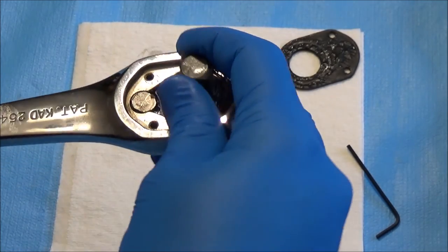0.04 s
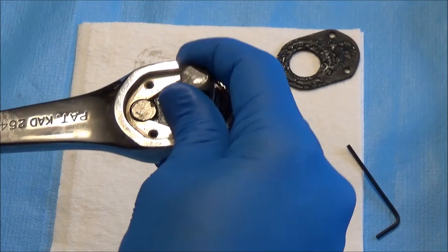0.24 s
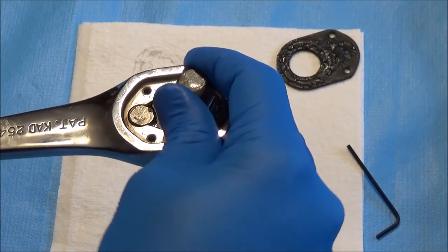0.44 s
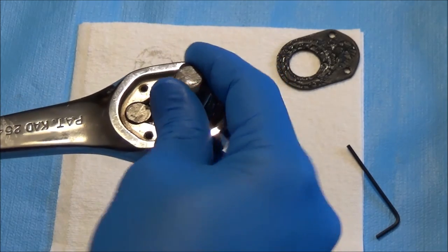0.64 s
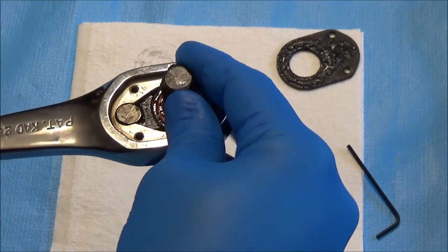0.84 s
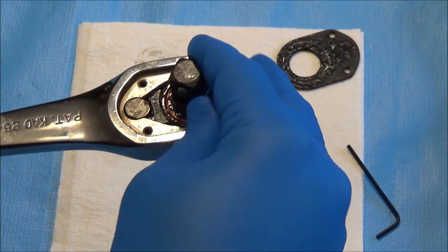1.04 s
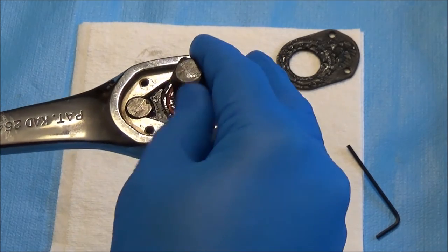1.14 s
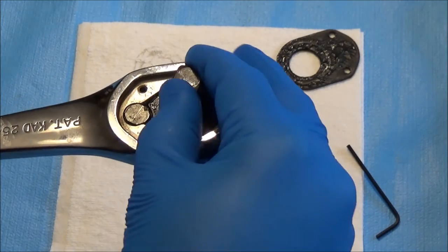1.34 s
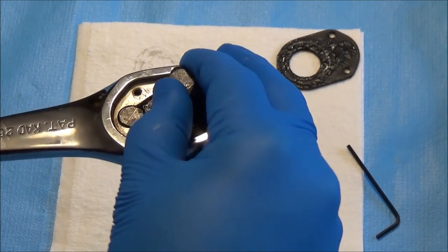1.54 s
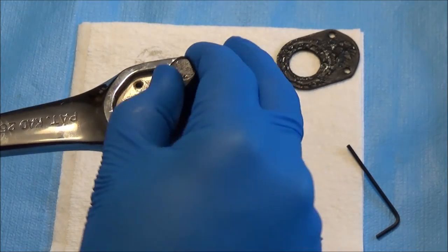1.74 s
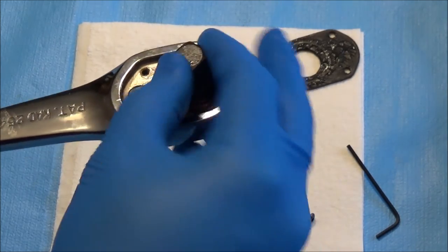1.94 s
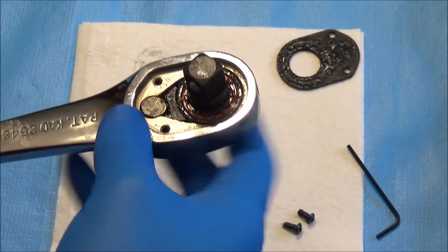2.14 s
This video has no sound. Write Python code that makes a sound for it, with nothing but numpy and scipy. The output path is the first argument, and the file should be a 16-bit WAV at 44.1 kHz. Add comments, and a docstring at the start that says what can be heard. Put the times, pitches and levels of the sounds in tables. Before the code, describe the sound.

Ratchet pawl clicking over gear teeth in two short runs, sharp metallic clicks, quiet small workshop

```python
"""In a quiet workshop one hears hiss, a low drone and fast soft pulsing; a glove rubs and loose parts tick.
A gloved hand close by turns the gear of an opened ratchet head: in two short runs, near the start and
near the end, the pawl drops over the teeth. Each drop makes decaying sines ring and a noise burst crack.
A hum comes and goes, and the drone swells near the end. Filtered noise, dying away, answers as the small room."""
import sys
import numpy as np
from scipy import signal
from scipy.fft import rfft, irfft
from scipy.io import wavfile

SR = 44100
rng = np.random.default_rng(int(sys.argv[2]) if len(sys.argv) > 2 else 0)


def master_out(mix):
    """Clip the mix to full scale and print it as 16-bit PCM to the path in sys.argv[1]."""
    frames = np.transpose(np.atleast_2d(mix))
    ceiling = np.clip(frames, -1, 1)
    pcm = np.round(ceiling * 32767).astype(np.int16)
    wavfile.write(sys.argv[1], SR, pcm)


N = 97020  # length in samples
TIME = np.arange(N) / SR  # seconds


def from_db(db):
    """Turn decibels into a gain."""
    return 10 ** (np.asarray(db) / 20)


def rms_one(x):
    """Scale a sound to an average (rms) level of 1."""
    return x / np.sqrt(np.mean(x ** 2) + 1e-20)


def at_hz(points):
    """Read a table of (Hz, value) at every FFT bin, in straight lines over log frequency."""
    hz, value = np.transpose(points)
    bin_hz = np.arange(N // 2 + 1) * SR / N
    return np.interp(np.log(bin_hz + 1), np.log(hz + 1), value)


def over_time(points):
    """Read a table of (seconds, value) at every sample."""
    return np.interp(TIME, *np.transpose(points))


def dying(start, t60):
    """An envelope that jumps to 1 and dies away by 60 dB in t60 seconds."""
    progress = np.clip((TIME - start) / t60, 0, 10)
    return (TIME >= start) * np.exp(-np.log(1000) * progress)


def noise(spectrum):
    """Mono noise of a given colour, rms 1."""
    return rms_one(irfft(rfft(rng.standard_normal(N)) * from_db(at_hz(spectrum)), N))


def stereo_noise(spectrum, likeness):
    """Stereo noise of a given colour, rms 1; the sides are the same at likeness 1 and unrelated at 0."""
    mid, side = rfft(rng.standard_normal((2, N))) * from_db(at_hz(spectrum))
    shared = np.sqrt(1 + likeness) * mid
    opposed = np.sqrt(1 - likeness) * side * [[1], [-1]]
    return rms_one(irfft(shared + opposed, N))


def band_noise(hz, width):
    """Noise in a soft-edged band, rms 1; its edges lie a factor of width either side of hz."""
    sos = signal.butter(2, [hz / width, hz * width], "band", fs=SR, output="sos")
    return rms_one(signal.sosfilt(sos, rng.standard_normal(N)))


def burst(source, start, t60):
    """A short dying piece of noise with a set energy."""
    envelope = dying(start, t60)
    return rms_one(source * envelope) * np.sqrt(np.mean(envelope ** 2))


def ring(clicks, hz, t60):
    """A resonance: each unit click sets off a sine that starts at height 1 and dies away."""
    r = np.exp(-np.log(1000) / (t60 * SR))  # what is left after one sample
    w = 2 * np.pi * hz / SR
    # the tiny offset keeps the filter away from extremely small numbers
    return signal.lfilter([0, np.sin(w)], [1, -2 * r * np.cos(w), r * r], clicks + 1e-18)


def tone(hz):
    """A steady sine of rms 1 with a random phase."""
    return np.sqrt(2) * np.sin(2 * np.pi * (hz * TIME + rng.random()))


def room_hiss():
    """Steady coloured noise whose left-right likeness depends on frequency."""
    # Colour of the hiss. Each row: frequency in Hz, relative level in dB per Hz.
    hiss_colour = [(20, -4), (40, -10.5), (60, -4.5), (100, -4.5), (220, -3.5), (400, -7.5), (700, -9),
                   (1250, -9.5), (2000, -13.5), (4000, -16), (8000, -21), (12000, -22), (16000, -30)]
    # Each row: frequency in Hz, left-right likeness from 0 to 1.
    hiss_likeness = [(60, .99), (150, 0.92), (380, 0.5), (950, 0.078), (2400, 0.27), (6000, 0.74),
                     (15000, 1)]
    hiss_db = -61
    return from_db(hiss_db) * stereo_noise(hiss_colour, at_hz(hiss_likeness))


def low_drone():
    """One deep sine whose level drifts."""
    # Level of the drone. Each row: time in seconds, level in dB.
    drone_level = [(0.0, -77), (0.02, -78.5), (0.78, -70), (1.31, -76), (1.38, -65.5), (2.11, -58),
                   (2.2, -61)]
    drone_hz = 32.4
    return from_db(over_time(drone_level)) * tone(drone_hz)


def wavering_hum():
    """A sine and its weaker octave swell and fade together."""
    # Level of the lower tone. Each row: time in seconds, level in dB.
    hum_level = [(0, -87), (0.17, -76), (0.32, -67.5), (0.5, -69.5), (0.68, -71), (0.82, -85), (1.98, -84),
                 (2.12, -60), (2.2, -72)]
    hum_hz, octave_db = 149, -4.5
    both = tone(hum_hz) + from_db(octave_db) * tone(2 * hum_hz)
    return from_db(over_time(hum_level)) * both


def hand():
    """The glove rubs and nudges the tool: each touch is a band of noise that swells quickly and fades."""
    # Soft rubs and bumps.
    # Each row: start in seconds, length in seconds, noise level before the swell in dB, centre in Hz.
    rubs = [(0, .2, -68, 380), (0, .18, -70, 9000), (0.62, .24, -60, 290), (1.46, .09, -66, 9500),
            (1.94, .36, -65, 9500), (2.0, .25, -68, 220), (2.04, .14, -68, 1100), (2.03, .24, -66, 3300)]
    width, attack_s = 1.245, 0.025
    total = np.zeros(N)
    for start, length, db, hz in rubs:
        swell = np.interp(TIME, [start, start + attack_s, start + length], [0, 1, 0])
        total += from_db(db) * band_noise(hz, width) * swell
    return total


def fast_pulsing():
    """Evenly spaced soft pulses, slightly uneven in level, set one small resonance ringing."""
    # How the pulsing weakens, then partly returns. Each row: time in seconds, level change in dB.
    pulse_fade = [(0, -1), (1.6, -2), (1.85, -10), (2.2, -4)]
    first_s, pulses_per_s = .0235, 30
    pulse_hz, pulse_db, scatter_db = 2672, -48, 1.3
    t60_s, rise_s = 0.029, 0.00054
    start = np.arange(first_s, N / SR, 1 / pulses_per_s)
    level_db = pulse_db + np.interp(start, *np.transpose(pulse_fade))
    level_db += scatter_db * rng.standard_normal(len(start))
    pulses = np.zeros(N)
    pulses[(start * SR).astype(int)] = from_db(level_db)
    # taking away a very short ring softens the start; log(1000) turns its time constant into a t60
    return ring(pulses, pulse_hz, t60_s) - ring(pulses, pulse_hz, rise_s * np.log(1000))


def loose_parts():
    """Loose parts touch lightly: dry bursts of noise, too light to ring the head."""
    # Each row: start in seconds, level in dB, centre in Hz.
    touches = [(0.089, -47.5, 8440), (0.135, -49.5, 10500), (0.1769, -39, 10700), (0.1932, -54, 9000),
               (0.1982, -46, 9500), (0.2042, -40.5, 8000), (0.2178, -39, 6500), (0.229, -40, 6000),
               (0.272, -32, 5500), (0.3458, -27, 6440), (0.6212, -35, 10900), (0.741, -49.5, 4500),
               (0.9135, -44, 8000), (1.0549, -51.5, 4000), (1.550, -33, 8900), (1.5569, -26, 7460),
               (1.6877, -21, 7200), (2.0588, -45, 6760), (2.0738, -41.5, 4170), (2.09, -49.5, 6000)]
    t60_s, width = 0.0068, 1.41
    return sum(from_db(db) * burst(band_noise(hz, width), start, t60_s) for start, db, hz in touches)


def chatter(x):
    """The pawl chatters as it seats: an all-pass filter adds quickly dying rebounds and keeps the colour."""
    spacing_s, share = .0007, 0.48
    a = np.zeros(int(spacing_s * SR) + 1)
    a[0], a[-1] = 1, share
    return signal.lfilter(a[::-1], a, x)


def pawl():
    """At each tooth the pawl slips lightly, then lands hard: the steel head rings and the contact cracks."""
    # The pawl drops into a tooth.
    # Each row: landing in seconds, ring in dB, crack in dB, tilt of the ring in dB per octave.
    drops = [(0.248, 0.5, -16.5, 2), (0.2784, 1, -14, 0), (0.3217, -0.5, -14.5, -1.5),
             (0.3713, 0, -11, -0.5), (0.435, 1.5, -12, 0), (0.497, -1, -13, -3), (1.6112, -1, -9, 3.5),
             (1.6658, -2.2, -8.5, -0.5), (1.7209, -1.7, -10, 1), (1.7726, -3, -11.5, 1),
             (1.8196, -3, -16, 2)]
    # Ringing tones (modes) of the steel head. Each row: frequency in Hz, relative level in dB, t60 in seconds.
    modes = [(819, -35, 0.077), (2175, -28, 0.031), (2815, -38.5, 0.037), (3650, -40, 0.017),
             (4296, -22, 0.0081), (4561, -17.5, 0.028), (5540, -29, 0.036), (6130, -15, 0.0019),
             (7128, -13, 0.011), (8225, -12, 0.0043), (9675, -10, 0.0031), (11500, -29, 0.005),
             (13280, -20, 0.0039), (15900, -39, .01)]
    # Colour of the crack before its lower tones are weakened.
    # Each row: frequency in Hz, relative level in dB.
    crack_colour = [(700, -17), (1500, -5.5), (3000, -20.5), (4500, -7), (6000, 0.5), (8000, -7.5),
                    (10000, -5), (12000, -9.5), (14000, -37.5), (16000, -33)]
    mode_scatter_db = 1.77
    slip_lead_s, slip_db = .0013, -17.5  # the pawl slips off the tooth tip just before it lands
    slip_tilt_db = -5  # dB per octave: the slip is a softer contact
    crack_t60_s = 0.0037
    crack_above_hz = 2730  # the crack is thin and bright, with its lower tones weakened

    landing, ring_db, crack_db, tilt_db = np.transpose(drops)
    scatter = rng.standard_normal((len(landing), len(modes)))
    centre = np.median([mode[0] for mode in modes])
    head = np.zeros(N)
    for k, (hz, db, t60) in enumerate(modes):
        octaves = np.log2(max(hz / centre, .5))  # tilts stop one octave below the centre
        force = from_db(db + ring_db + tilt_db * octaves + mode_scatter_db * scatter[:, k])
        slip_gain = from_db(slip_db + slip_tilt_db * octaves)
        hits = np.zeros(N)
        hits[(landing * SR).astype(int)] = force
        hits[((landing - slip_lead_s) * SR).astype(int)] = force * slip_gain
        head += (-1) ** k * ring(hits, hz, t60)  # neighbouring modes start in opposite directions

    grit = noise(crack_colour)
    cracks = sum(from_db(db) * burst(grit, start, crack_t60_s) for start, db in zip(landing, crack_db))
    high_pass = signal.butter(1, crack_above_hz, "high", fs=SR, output="sos")
    return chatter(head), signal.sosfilt(high_pass, cracks)


def thin_and_soften(x):
    """The clicks and ticks are thinned below about 2 kHz and softened above about 13 kHz."""
    thin_below_hz, soften_above_hz = 2067, 12800
    x = signal.sosfilt(signal.butter(3, thin_below_hz, "high", fs=SR, output="sos"), x)
    return signal.sosfilt(signal.butter(4, soften_above_hz, fs=SR, output="sos"), x)


def workshop(x):
    """Quick reflections off the bench and one near echo, with a diffuse tail whose treble dies first."""
    # What the bench and the walls give back. Each row: frequency in Hz, relative level in dB.
    room_colour = [(500, 9), (1200, 6.5), (2200, 0), (2800, 5), (4500, -1), (6300, -1.5), (8400, -1),
                   (10500, 0.5), (12000, -4), (16000, -11)]
    # Each row: frequency in Hz, left-right likeness of the tail from 0 to 1.
    tail_likeness = [(60, 0.46), (240, 0.72), (950, 0.23), (3770, 0.69), (15000, 1)]
    room_db, room_t60_s, treble_t60_s, room_delay_s = -15, 0.55, .33, 0.016
    bench_db, bench_t60_s, bench_delay_s, bench_likeness = -16, 0.14, 0.0044, 0.6
    echo_s, echo_db = .0142, -30  # one distinct reflection from a near surface

    diffuse = stereo_noise(room_colour, at_hz(tail_likeness))
    low = signal.sosfiltfilt(signal.butter(2, 6500, fs=SR, output="sos"), diffuse)
    treble = diffuse - low
    tail = low * dying(room_delay_s, room_t60_s) + treble * dying(room_delay_s, treble_t60_s)
    bench = stereo_noise(room_colour, bench_likeness) * dying(bench_delay_s, bench_t60_s)
    response = from_db(room_db) * rms_one(tail) + from_db(bench_db) * rms_one(bench)
    response /= np.sqrt(N)  # the levels now set the energy of the whole response
    response[:, int(echo_s * SR)] += from_db(echo_db)
    return signal.fftconvolve(x[None], response, axes=1)[:, :N]


def scene():
    """The ratchet close by and a little to the left, its room, and the quiet sounds around it."""
    # Where the ratchet lies. Each row: frequency in Hz, left minus right in dB.
    pan = [(1300, 4), (2300, 0), (4500, 3), (8000, 1.34), (15000, 1.1)]
    room_ring_db, room_crack_db = -1.5, 2.5  # the cracks spread into the room more than the ring does
    head, cracks = (thin_and_soften(part) for part in pawl())
    ticks = thin_and_soften(loose_parts())
    side_gains = from_db(at_hz(pan) * [[.5], [-.5]])
    direct = irfft(rfft(head + cracks + ticks) * side_gains, N)
    room = workshop(from_db(room_ring_db) * head + from_db(room_crack_db) * cracks + ticks)
    background = room_hiss() + low_drone() + wavering_hum()
    return direct + room + hand() + fast_pulsing() + background


def record(dry):
    """The top is cut steeply by a low-pass filter."""
    cutoff_hz = 16900  # from here up at least 60 dB down
    return signal.sosfilt(signal.cheby2(16, 60, cutoff_hz, fs=SR, output="sos"), dry)


dry = scene()
out = record(dry)
master_out(out)
```